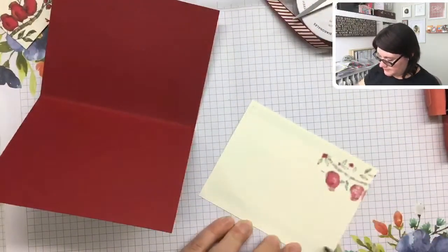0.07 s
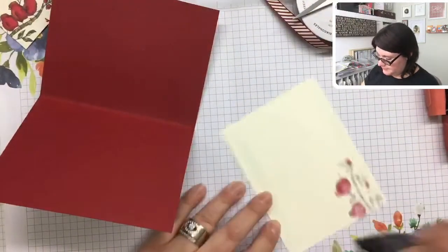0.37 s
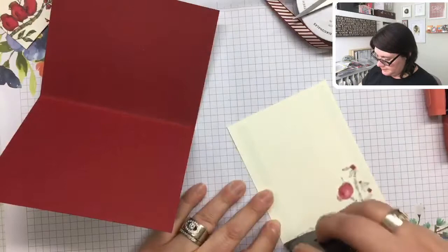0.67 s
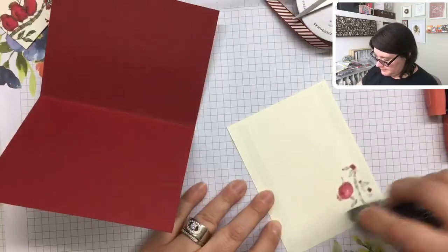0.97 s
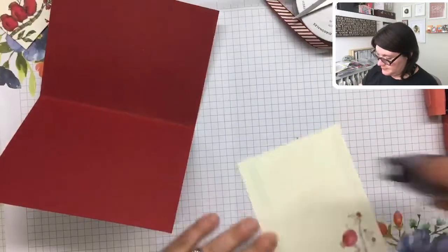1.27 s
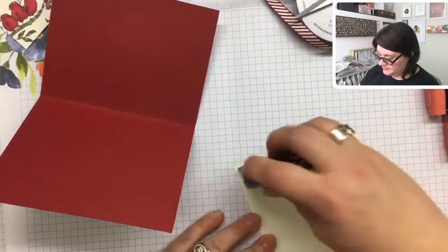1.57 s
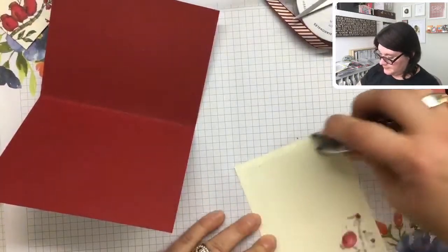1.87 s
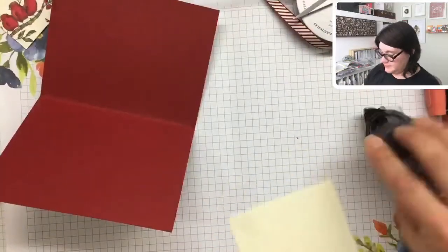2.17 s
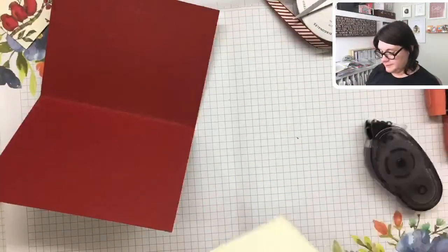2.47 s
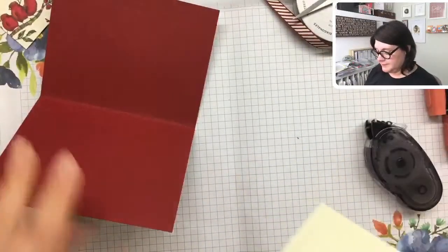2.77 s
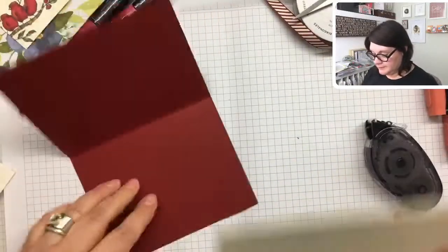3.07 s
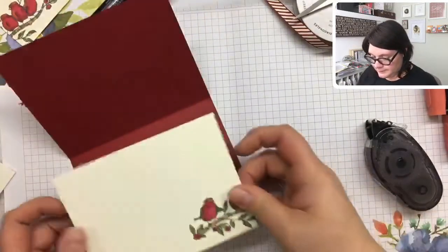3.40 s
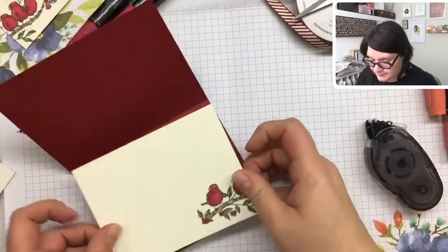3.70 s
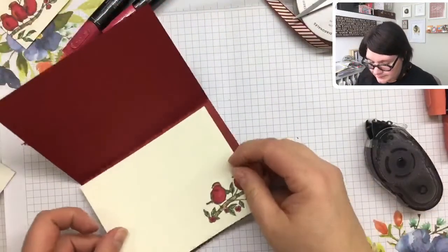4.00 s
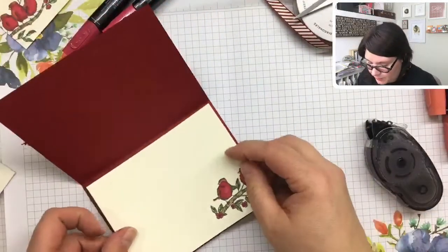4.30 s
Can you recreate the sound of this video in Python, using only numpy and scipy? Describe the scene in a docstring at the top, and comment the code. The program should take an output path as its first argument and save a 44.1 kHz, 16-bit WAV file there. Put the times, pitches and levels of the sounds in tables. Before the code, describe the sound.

A plastic tape runner is already rasping over cardstock at the start, close by, its ratchet clicking quickly. This stroke ends almost at once, leaving a few small snaps and a soft hiss of card on the mat. A second stroke runs from about 0.7 to 1.2 seconds and a third from 1.6 to 2 seconds, each starting with a soft bump and full of rattling clicks, peeling tape and faint roller rumble. Between 2.2 and 2.4 seconds the runner is set down with several plastic clacks and dull desk thuds. From 2.6 to 3.1 seconds a card is flicked at its edges and slides, slapping flat near 2.9 seconds. A thin tick comes around 3.5 seconds amid faint sliding, and a light pat near 4.3 seconds. The small room has a steady low rumble and faint mains hum.

```python
"""A plastic tape runner rattles and rasps over cardstock in three short strokes.
Ratchet clicks, snaps and peeling tape sound through its shell; its roller rumbles through the desk.
It is set down with a few knocks: the shell clacks, the desk thuds.
A card hisses over the mat, is flicked at its edges and slaps down flat.
Behind it all: a small room with a low rumble and mains hum."""
import sys
import numpy as np
from scipy import signal
from scipy.fft import rfft, irfft, next_fast_len
from scipy.io import wavfile
from scipy.ndimage import uniform_filter1d, map_coordinates

SR = 44100
rng = np.random.default_rng(int(sys.argv[2]) if len(sys.argv) > 2 else 0)


def master_out(mix):
    """Clip the mix to full scale and print it as 16-bit PCM to the path in sys.argv[1]."""
    frames = np.transpose(np.atleast_2d(mix))
    ceiling = np.clip(frames, -1, 1)
    pcm = np.round(ceiling * 32767).astype(np.int16)
    wavfile.write(sys.argv[1], SR, pcm)


N = 191658
TIME = np.arange(N) / SR
FFT_SIZE = next_fast_len(N + SR)
HZ = np.fft.rfftfreq(FFT_SIZE, 1 / SR)

# Spectra. Each row: frequency in Hz, relative density in dB.
ROOM_SPECTRUM = [(15, -27), (25, -79), (48, -9.5), (123, -6), (200, -13), (229, -11.5), (293, -11.5),
                 (317, -20), (354, -17), (451, -25), (591, -25), (775, -28), (1130, -28), (5880, -35),
                 (9000, -42), (16000, -44.5)]
CARD_RUB_SPECTRUM = [(100, -36), (600, 0.5), (1500, -5), (3000, 5), (5000, -2.5), (6100, 2), (7500, -1),
                     (9000, -5), (13000, -5.5), (16000, -7)]
CARD_EDGE_SPECTRUM = [(150, -21), (550, 7), (1400, 2), (2000, -0.5), (3400, 2.5), (6200, -6), (9000, -17.5),
                      (16000, -21)]
CLACK_SPECTRUM = [(100, -9), (500, 0), (950, -14.5), (1500, 6), (2000, 2), (2500, -3), (4000, -3.5),
                  (5500, -8.5), (7000, -7), (10000, -14), (16000, -18)]
ROLLER_SPECTRUM = [(30, -33), (60, -7.5), (135, 3), (200, -14), (330, -12), (500, -31.5), (1500, -48),
                   (16000, -70)]
CRACK_SPECTRUM = [(100, -73), (500, -13), (900, -13), (1400, 0.5), (3000, 4.5), (4200, 3.5), (7000, 2.5),
                  (8700, -10), (11000, -9.5), (13500, -6), (16000, -13)]
# Mains hum. Each row: frequency in Hz, relative level in dB.
HUM_PARTIALS = [(118.4, -104), (231.5, -62), (349.9, -77.5)]
# Room decay. Each row: frequency in Hz, t60 in seconds.
WALL_DECAY = [(100, 0.62), (400, 0.23), (2000, 0.23), (6000, 0.26), (15000, 0.2)]
# Card on the mat. Each row: fastest moment in seconds, level in dB, swell and fade in seconds,
# treble gain in dB.
CARD_SLIDES = [(.14, -65, .15, 0.036, 0), (.31, -68.5, 0.098, 0.083, 4.5), (1.254, -72, 0.08, 0.056, 9.5),
               (2.06, -73, 0.018, 0.021, 9.5), (2.158, -73, .04, 0.056, 14.5),
               (2.96, -70.5, 0.028, 0.12, 1.5), (3.068, -65, 0.028, 0.021, -3), (3.5, -74, 0.51, 0.31, 0)]
# Edge flicks. Each row: time in seconds, drive in dB, high-pass corner in Hz.
CARD_FLICKS = [(2.673, -39.5, 312), (2.9035, -44.5, 596), (2.927, -45.5, 403), (2.94, -49.5, 1500),
               (3.056, -49.5, 1470), (3.07, -50.5, 200), (3.086, -66, 1500), (3.449, -42, 3670),
               (3.454, -54, 3500)]
# Card landing or pressed flat. Each row: time in seconds, drive in dB, rise and t60 in seconds,
# pitch in Hz.
CARD_SLAPS = [(2.596, -58.5, .02, 0.031, 690), (2.684, -51, .005, 0.084, 560),
              (2.702, -47.5, 0.0029, 0.04, 620), (2.937, -33.5, 0.0023, 0.027, 1085),
              (2.961, -50, 0.0027, 0.057, 1140), (4.341, -38, 0.0013, 0.053, 370)]
# Card on its air cushion. Each row: frequency and width as multiples of the pitch, relative gain in dB.
CARD_MODES = [(0.251, .15, -10), (.64, .18, -5.5), (1.001, 0.059, 5.5), (1.33, 0.13, -0.5),
              (2.45, 0.57, -13)]
# Runner on the desk. Each row: time in seconds, relative clack and thud levels in dB,
# contact time in seconds, share of the desk's ring time left by the hand.
DESK_KNOCKS = [(0.725, -51, -19.5, 0.0074, 0.4), (1.625, -54.5, -19.5, 0.0093, 0.18),
               (2.2135, -40.5, -27.5, 0.0016, 0.5), (2.2174, -38.5, -34, 0.0019, 0.65),
               (2.2294, -38.5, -65, 0.0014, 0.9), (2.3284, -47, -49, 0.00012, 1),
               (2.335, -29.5, -66, 0.00069, 0.6), (2.341, -57, -26.5, 0.00031, 0.75),
               (2.349, -42, -60, 0.00033, 0.5), (2.4, -43, -65, .0025, 1),
               (2.4095, -35.5, -39.5, 0.001003, 0.64)]
# Desk resonances. Each row: frequency in Hz, relative gain in dB, undamped t60 in seconds.
DESK_MODES = [(89, -9.5, 0.16), (113, -2, 0.12), (141.4, 1, 0.22), (271.8, 0, 0.24), (303, -3.5, 0.2),
              (340.6, -3.5, 0.13), (478, -18, 0.28), (545, -20, 0.095), (625, -18.5, 0.11)]
# Plastic shell, loose and gripped. Each row: frequency and width in Hz, relative gain in dB.
LOOSE_SHELL_MODES = [(1450, 130, -18), (1490, 140, 5), (1730, 120, 9), (2130, 180, -13), (2680, 180, 11),
                     (4140, 420, 13), (5130, 130, -3)]
HELD_SHELL_MODES = [(1305, 39, -1), (1824, 190, 1.5), (2520, 110, -21), (2740, 970, -2.5), (3360, 670, -19),
                    (4180, 190, 11), (4450, 290, -2), (6520, 2000, 13.5), (6630, 1500, 12)]
# Tip or ratchet catching, and light ticks as the runner is handled. Each row: time in seconds, crack drive in
# dB, ping pitch in Hz, relative ping level in dB.
RUNNER_SNAPS = [(.0095, -37.5, 5600, -38.5), (0.02, -39, 1760, -43.5), (0.042, -60, 3950, -42),
                (0.0837, -57, 4050, -42), (.109, -41, 4230, -42.5), (0.252, -49, 1700, -59),
                (0.301, -49, 1590, -56), (.446, -56, 1750, -61), (0.7293, -42.5, 1590, -42),
                (0.7347, -38.5, 1680, -41.5), (.779, -38.5, 1616, -38), (0.805, -41, 4000, -52),
                (0.826, -41, 1700, -45.5), (.845, -41, 3800, -47), (0.8591, -39, 5770, -46),
                (.873, -42.5, 1710, -41.5), (1.05, -44, 4070, -37), (1.1029, -44, 3940, -37),
                (1.127, -42, 4410, -45), (1.6266, -39.5, 1600, -38), (1.651, -45.5, 4230, -47),
                (1.666, -41.5, 1500, -41.5), (1.6994, -39, 3970, -35.5), (1.734, -34.5, 2720, -48),
                (1.743, -43, 1530, -39), (1.883, -44, 6000, -41), (1.894, -33.5, 6200, -37.5),
                (1.915, -38, 3600, -41), (1.932, -41, 4260, -37.5), (1.968, -38, 3250, -47)]
# Hand strokes. Each row: start, fastest moment and end in seconds, top speed in teeth per second,
# drive in dB.
RUNNER_STROKES = [(-.25, -0.041, 0.11, 130, -44.5), (.73, 0.982, 1.166, 131, -49),
                  (1.669, 1.844, 1.985, 135, -48.5)]


def amp(db):
    """Decibels to gain."""
    return 10 ** (np.asarray(db) / 20)


def unit(x):
    """Scale to rms 1."""
    return x / np.sqrt(np.mean(np.abs(x) ** 2) + 1e-20)


def along(points, hz):
    """Interpolate (Hz, value) points over log frequency."""
    point_hz, values = np.transpose(points)
    return np.interp(np.log(hz + 1), np.log(point_hz + 1), values)


def filtered(x, response):
    """Apply a frequency response."""
    return irfft(rfft(x, FFT_SIZE) * response, FFT_SIZE)[:N]


def lowpass(edge_hz):
    """Smooth zero-phase low-pass response."""
    return 1 / (1 + (HZ / edge_hz) ** 6)


def colour(spectrum):
    """Minimum-phase, unit-power response with this spectrum."""
    cepstrum = irfft(np.log(amp(along(spectrum, HZ))), FFT_SIZE)
    cepstrum[1:FFT_SIZE // 2] *= 2
    cepstrum[FFT_SIZE // 2 + 1:] = 0
    return unit(np.exp(rfft(cepstrum)))


def resonances(modes, hz=HZ):
    """Unit-power response of modes with alternating signs."""
    return unit(sum((-1) ** k * amp(db) * 1j * hz * width / (centre ** 2 - hz ** 2 + 1j * hz * width)
                    for k, (centre, width, db) in enumerate(modes)))


def add(track, at_s, sound):
    """Mix a sound into a track."""
    start = max(round(at_s * SR), 0)
    track[start:start + len(sound)] += sound[:len(track[start:])]


def varying_convolve(x, draw_impulse, step_s):
    """Convolve, crossfading to a new impulse response each step."""
    track = np.zeros(N)
    for at_s in np.arange(0, N / SR + step_s, step_s):
        near = slice(max(round((at_s - step_s) * SR), 0), round((at_s + step_s) * SR))
        piece = x[near] * (1 - np.abs(TIME[near] - at_s) / step_s)
        add(track, near.start / SR, signal.fftconvolve(piece, draw_impulse()))
    return track


def burst(rise_s, t60_s):
    """Whitened contact noise: swells for 4 rise times, then dies."""
    t = np.arange(round((4 * rise_s + t60_s) * SR)) / SR - 4 * rise_s
    envelope = np.minimum(np.exp(np.minimum(t, 0) / rise_s), amp(-60 * t / t60_s))
    spectrum = rfft(envelope * rng.standard_normal(len(t)))
    white = irfft(spectrum / np.abs(spectrum), len(t)) * np.sqrt(envelope)
    return white * np.linalg.norm(envelope) / np.linalg.norm(white)


def strike(peak_s, db, rise_s, t60_s):
    """A track holding one contact burst."""
    track = np.zeros(N)
    add(track, peak_s - 4 * rise_s, amp(db) * burst(rise_s, t60_s))
    return track


def friction(grain_hz, depth_db):
    """Noise of rms 1 with a grainy, random level."""
    knots = rng.standard_normal(int(N * grain_hz / SR) + 4)
    level_db = depth_db * map_coordinates(knots, [TIME * grain_hz], order=1)
    return unit(rng.standard_normal(N) * amp(level_db))


def background():
    """Steady room rumble, hiss and mains hum."""
    noise = unit(filtered(rng.standard_normal(N), colour(ROOM_SPECTRUM)))
    hum = sum(amp(db) * np.sqrt(2) * np.sin(2 * np.pi * (hz * TIME + rng.random()))
              for hz, db in HUM_PARTIALS)
    return amp(-59.5) * noise + amp(-2.5) * hum


def room_impulse():
    """Wall echoes: a short tail, 4 ms late; the bass lasts longest."""
    hz, t, spectra = signal.stft(rng.standard_normal(SR // 3), SR, nperseg=256)
    decay = amp(-60 * t / along(WALL_DECAY, hz)[:, None])
    tail = signal.istft(spectra * decay, SR, nperseg=256)[1]
    return np.pad(tail / np.linalg.norm(tail), (round(.004 * SR), 0))


def card_slides():
    """Cardstock rubs the mat in bell-shaped swells of hiss."""
    rub = filtered(friction(grain_hz=290, depth_db=2.5), colour(CARD_RUB_SPECTRUM))
    dull = filtered(rub, lowpass(4100))
    track = np.zeros(N)
    for peak_s, db, swell_s, fade_s, treble_db in CARD_SLIDES:
        width_s = np.where(TIME < peak_s, swell_s, fade_s)
        envelope = np.exp(-.5 * ((TIME - peak_s) / width_s) ** 2)
        track += amp(db) * envelope * (dull + amp(treble_db) * (rub - dull))
    return track


def card_flicks():
    """Flicked edges give short, thin ticks."""
    ticks = sum(filtered(strike(at_s, db, rise_s=.00028, t60_s=.018), 1j * HZ / (corner_hz + 1j * HZ))
                for at_s, db, corner_hz in CARD_FLICKS)
    return filtered(ticks, colour(CARD_EDGE_SPECTRUM))


def card_slaps():
    """The card lands flat and resonates over a cushion of air."""
    track = np.zeros(N)
    for at_s, db, rise_s, t60_s, hz in CARD_SLAPS:
        body = resonances([(ratio * hz, width * hz, mode_db) for ratio, width, mode_db in CARD_MODES])
        softened = unit(body / (1 + 1j * HZ / 3500))  # soft paper is dull
        track += filtered(strike(at_s, db, rise_s, t60_s), softened)
    return track


def desk_thud(contact_s, ring_share, light_cycles=.068):
    """Struck desk modes; a contact too long or too short for a mode hardly moves it."""
    t = np.arange(SR // 2) / SR
    ring = np.zeros(len(t))
    for hz, db, t60_s in DESK_MODES:
        cycles = hz * contact_s
        push = 1 / (1 + cycles ** 2) / (1 + (light_cycles / cycles) ** 2)
        envelope = amp(db + rng.normal(0, 1) - 60 * t / (t60_s * ring_share))
        ring += push * envelope * np.sin(2 * np.pi * hz * t)
    return ring * (1 - np.exp(-t / contact_s))


def knocks(hard_contact_s=.00035, loss_db_per_doubling=4.5, ring_delay_s=.001966):
    """Runner meets desk: thud, shell clack, gear jingle, loose parts. Longer contacts are duller."""
    thuds, clacks, treble, rattle = np.zeros((4, N))
    for at_s, clack_db, thud_db, contact_s, ring_share in DESK_KNOCKS:
        add(thuds, at_s, amp(thud_db - 5) * desk_thud(contact_s, ring_share))
        clack = strike(at_s, clack_db, rise_s=.0003154 + .3 * contact_s, t60_s=.019)
        jingle = strike(at_s, clack_db - 5.5, rise_s=.001, t60_s=.078)
        clacks += clack
        treble += (clack + jingle) * amp(-loss_db_per_doubling * np.log2(contact_s / hard_contact_s))
        rattle += strike(at_s, clack_db - 25.5, rise_s=.001, t60_s=.38)
    clacks = treble + filtered(clacks - treble, lowpass(6100))  # crossover
    thuds = signal.sosfilt(signal.butter(3, 65, "high", fs=SR, output="sos"), thuds)
    shell = resonances(LOOSE_SHELL_MODES) * np.exp(-2j * np.pi * HZ * ring_delay_s)
    ring = filtered(amp(-9) * clacks + amp(-10) * rattle, shell)
    direct = filtered(clacks + amp(2) * rattle, colour(CLACK_SPECTRUM))
    return thuds + direct + ring


def shell_impulse(delay_s=.0008945):
    """The held shell's ring; the shifting grip alters each mode's pitch and level."""
    hz = np.fft.rfftfreq(2048, 1 / SR)
    modes = [(centre * np.exp(.035 * rng.standard_normal()), width, db + 2.5 * rng.standard_normal())
             for centre, width, db in HELD_SHELL_MODES]
    delay = np.exp(-2j * np.pi * hz * delay_s)
    return irfft(resonances(modes, hz) * delay / (1 + (hz / 8000) ** 4))


def ping(hz, attack_s=.00031, t60_at_1khz_s=.025):
    """A small plastic part buzzes at an unsteady pitch; higher ones die sooner."""
    t = np.arange(SR // 20) / SR
    t60_s = t60_at_1khz_s / np.sqrt(hz / 1000)
    wander = .07 * unit(uniform_filter1d(rng.standard_normal(len(t)), size=32))
    phase = 2 * np.pi * hz * np.cumsum(1 + wander) / SR
    return np.sin(phase) * (1 - np.exp(-t / attack_s)) * amp(-60 * t / t60_s)


def ratchet(teeth_hz, jitter_s=.0005, scatter_db=2):
    """One click per notch the spool turns, except within 4 ms of a snap."""
    notches = np.floor(np.cumsum(teeth_hz) / SR)
    clicks_s = TIME[np.flatnonzero(np.diff(notches))]
    snaps_s = np.array(RUNNER_SNAPS)[:, 0]
    track = np.zeros(N)
    for at_s, (late, size) in zip(clicks_s, rng.standard_normal((len(clicks_s), 2))):
        free = np.min(np.abs(snaps_s - at_s)) > .004
        click = amp(scatter_db * size) * burst(rise_s=.00078, t60_s=.02)
        add(track, at_s + jitter_s * late, free * click)
    return track


def stroke(start_s, fastest_s, end_s, top_hz, db):
    """Peeling tape and ratchet as the hand speeds up and slows. Returns clatter, rasp, treble drives."""
    crawl_hz, bite_hz = 22, 105  # teeth per second; the pawl bites hardest at bite_hz, skims above
    slow_db_per_octave, skim_db_per_octave, treble_exponent = 3.5, 8.5, 2.64
    press_s, ease_s, lift_db_per_s = .011, .11, 260
    teeth_hz = np.interp(TIME, [start_s, fastest_s, end_s], [crawl_hz, top_hz, crawl_hz])
    press = np.clip((TIME - start_s) / press_s, 0, 1)
    lift = amp(-lift_db_per_s * np.maximum(TIME - end_s, 0))
    peel = friction(grain_hz=900, depth_db=3)
    teeth = ratchet(teeth_hz * (TIME > start_s) * (TIME < end_s + ease_s))
    drive = amp(db) * press * lift * (amp(-2.5) * peel + amp(5.3) * teeth)
    octaves = np.log2(teeth_hz / bite_hz)
    bite_db = np.minimum(slow_db_per_octave * octaves, -skim_db_per_octave * octaves)
    pressure_db = np.interp(TIME, [end_s - ease_s, end_s], [3.5, -7.5])  # the hand eases off
    clatter_db = pressure_db + np.minimum(slow_db_per_octave * octaves, 0)
    return drive * amp([clatter_db, bite_db, treble_exponent * bite_db])


def tape_runner(snap_rise_s=.0007):
    """Strokes and snaps sound through the plastic shell; the roller shakes the desk."""
    clatter, rasp, treble = sum(stroke(*row) for row in RUNNER_STROKES)
    rumble = amp(-11) * filtered(rasp, colour(ROLLER_SPECTRUM))
    pings = np.zeros(N)
    for at_s, db, ping_hz, ping_db in RUNNER_SNAPS:
        snap = strike(at_s, db, snap_rise_s, t60_s=.016)
        clatter += snap
        rasp += snap
        treble += snap * amp(-10.5 + 2.5 * np.log2(ping_hz / 1000))  # higher snaps are brighter
        add(pings, at_s - snap_rise_s, amp(ping_db + 6) * ping(ping_hz))
    low, low_mid = lowpass(2420), lowpass(4000)
    force = filtered(clatter, low) + filtered(rasp, low_mid - low) + filtered(treble, 1 - low_mid)
    ring = varying_convolve(force, shell_impulse, step_s=.025)
    crack = filtered(force, colour(CRACK_SPECTRUM))
    return rumble + pings + amp(-4) * ring + crack


def scene():
    """Mono mix. Short, diffuse room echoes, with a new random tail every 0.1 s."""
    direct = tape_runner() + knocks() + card_slides() + card_flicks() + card_slaps()
    echoes = varying_convolve(direct, room_impulse, step_s=.1)
    return (direct + amp(-3) * echoes + background())[None]


def record(dry):
    """Band limit at 15.9 kHz."""
    return np.array([filtered(channel, HZ < 15900) for channel in dry])


dry = scene()
out = record(dry)
master_out(out)
```